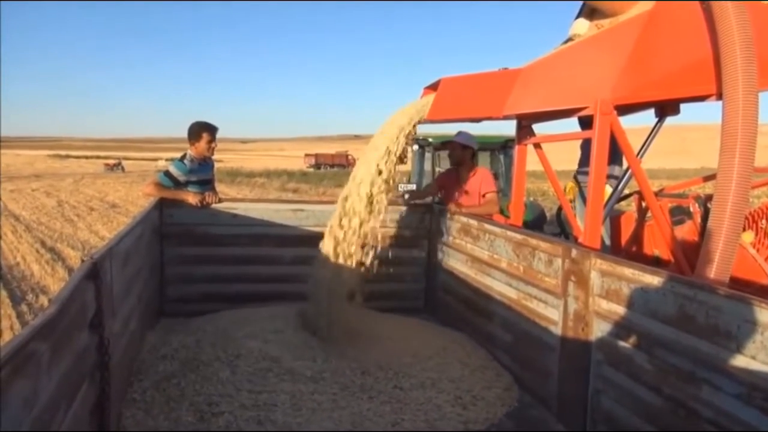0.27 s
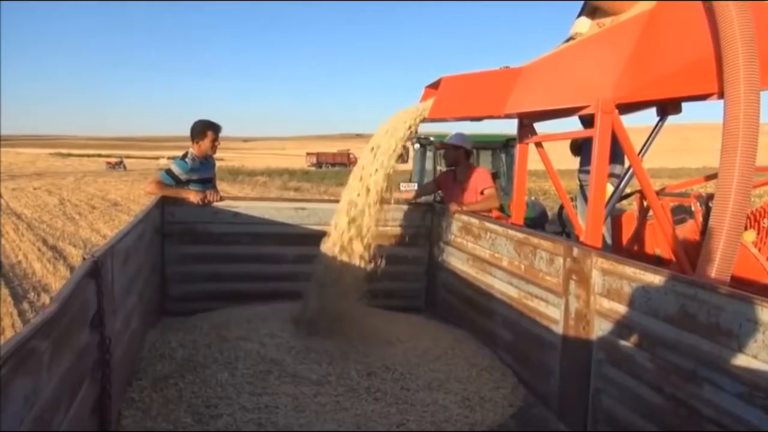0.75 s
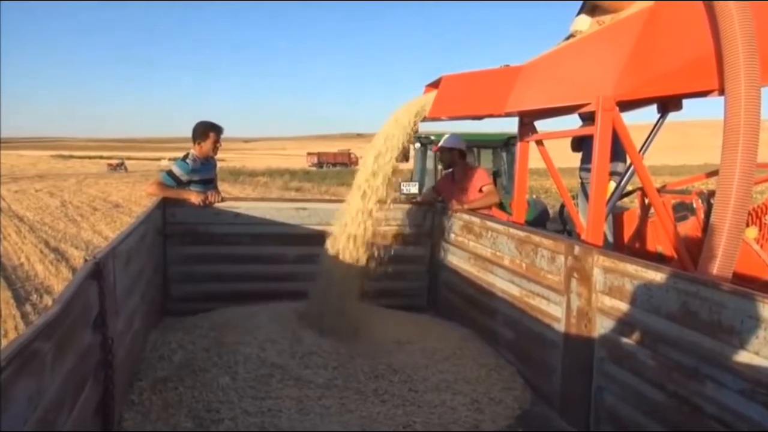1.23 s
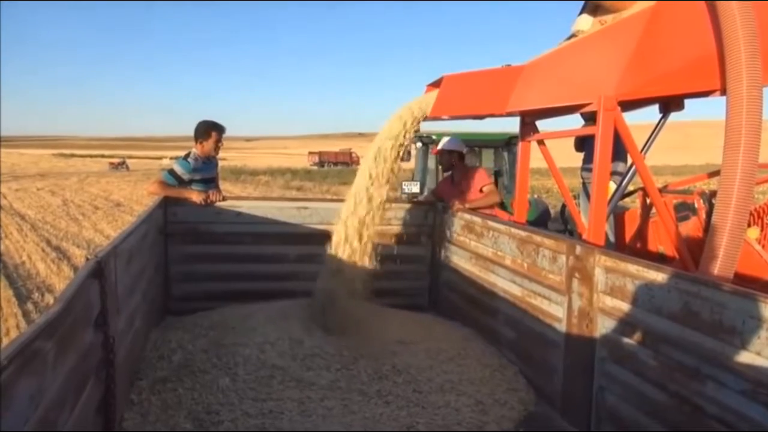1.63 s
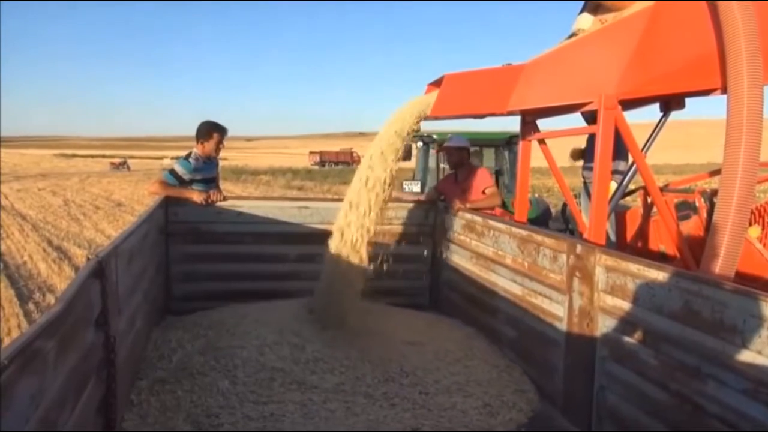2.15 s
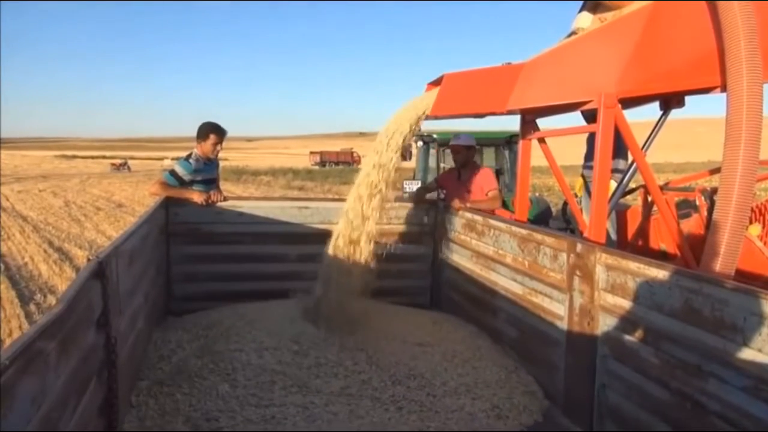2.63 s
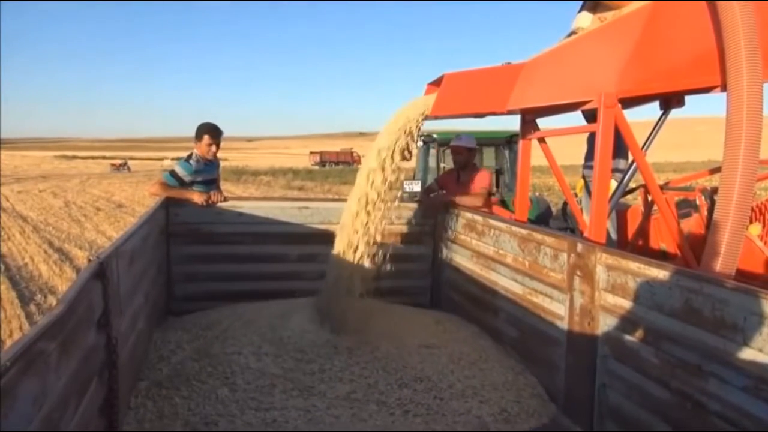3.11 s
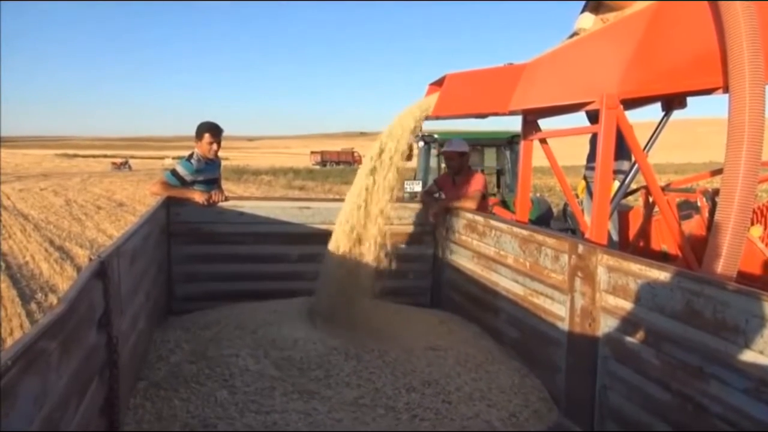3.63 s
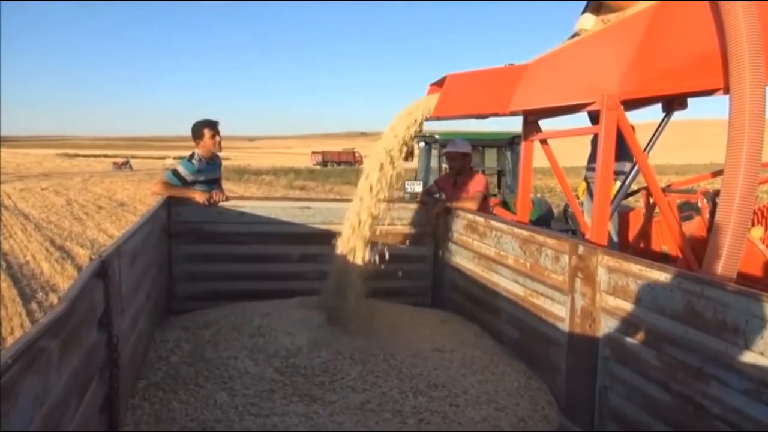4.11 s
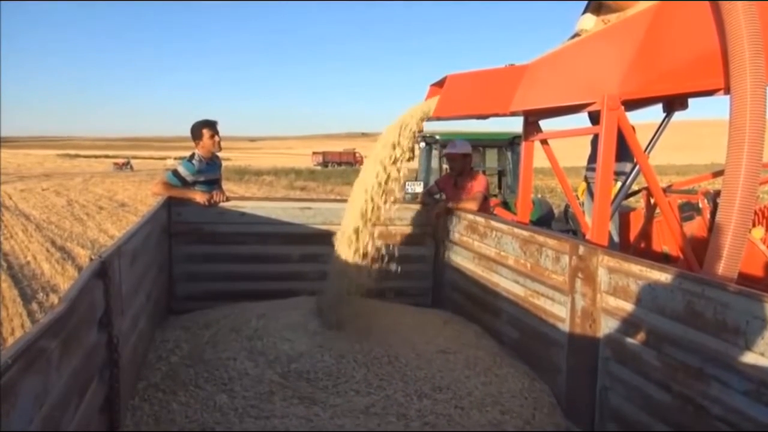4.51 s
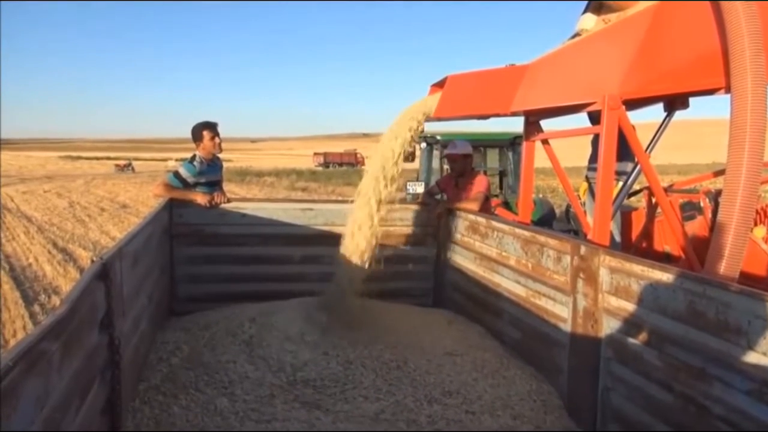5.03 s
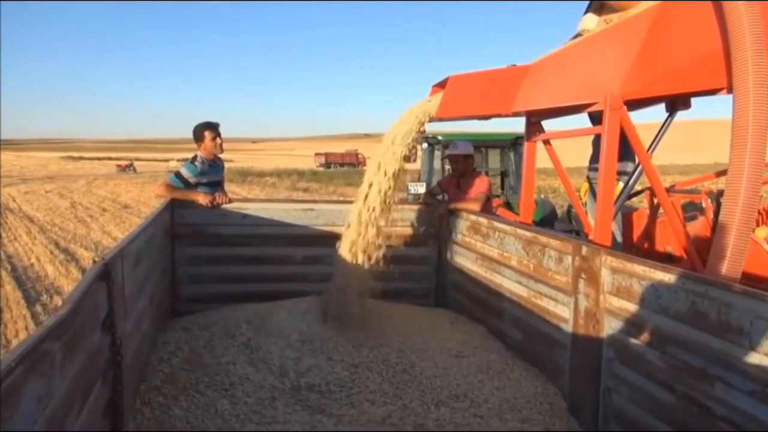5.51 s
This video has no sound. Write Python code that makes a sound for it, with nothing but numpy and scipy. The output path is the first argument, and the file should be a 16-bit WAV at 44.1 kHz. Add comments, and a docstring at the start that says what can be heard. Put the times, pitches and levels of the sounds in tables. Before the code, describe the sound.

A bright, dense hiss of grain pouring from a harvester spout into a steel trailer runs from the start to the end, nearly six seconds. It is made of countless tiny kernel ticks and light metallic pings that merge together, surging and easing slightly with the flow. Between about 0.9 and 1.7 seconds, a handful of very short, higher pings stand out, the clearest near 1.3 seconds. Beneath the hiss, a quieter, dull rumble like shaken steel walls flutters irregularly, stronger on the right. It swells a little from about 2.3 to 3.5 seconds and again from 4.2 to 5 seconds. Lower and fainter still, the machine's deep drone slowly rises and sinks throughout. The sound is close and dry, in an open field, with a narrow stereo image.

```python
"""A bright hiss of threshed grain pouring from a spout onto the heap in a steel trailer, in an open field.
Thousands of kernels a second tick against each other or ping on the steel; the impacts merge into
noise that surges with the flow, and a few louder notes ring out early on. Beneath it a dull rumble,
as of shaken steel walls, swells and flickers, louder on the right, over the deep drone of the machine.
A narrow stereo microphone stands close by."""
import sys
import numpy as np
from scipy import signal
from scipy.fft import rfft, irfft, next_fast_len
from scipy.io import wavfile
from scipy.ndimage import uniform_filter1d

SR = 44100
rng = np.random.default_rng(int(sys.argv[2]) if len(sys.argv) > 2 else 0)


def wrap_up_sound(samples):
    """Save the sound to the file named by the first command line argument, as 16-bit audio."""
    columns = np.atleast_2d(samples).T
    # keep every value between -1 and 1, then stretch to whole-number steps
    tamed = np.clip(columns, -1, 1)
    steps = np.round(tamed * 32767).astype(np.int16)
    wavfile.write(sys.argv[1], SR, steps)


N = 253611
TIME = np.arange(N) / SR
FRAMES = dict(nperseg=512, noverlap=384)


def amp(db):
    """Amplitude ratio of a level in decibels."""
    return 10 ** (np.asarray(db) / 20)


def unit_rms(x):
    """Normalisation to unit mean power."""
    return x / np.sqrt(np.mean(x ** 2) + 1e-20)


def curve(points):
    """Interpolation in log frequency: turns (Hz, dB) points into a function."""
    freqs, db = np.transpose(points)
    return lambda hz: np.interp(np.log(hz + 1), np.log(freqs + 1), db)


def filtered(x, gain_db):
    """Zero-phase filtering by a function from Hz to dB."""
    size = next_fast_len(N + 4096)
    hz = np.fft.rfftfreq(size, 1 / SR)
    return irfft(rfft(x, size) * amp(gain_db(hz)), size)[..., :N]


def flutter(top_hz):
    """Random modulation: low-passed noise of unit rms."""
    return unit_rms(filtered(rng.standard_normal(N), lambda hz: -20 * np.log10(1 + (hz / top_hz) ** 2)))


def band_envelopes(x, splits_hz, rows):
    """Amplitude modulation by band: each band of x follows its own level column."""
    times, *levels_db = np.transpose(rows)
    lows = [filtered(x, lambda hz: -20 * np.log10(1 + (hz / edge) ** 6)) for edge in splits_hz]
    bands = np.diff([0 * x, *lows, x], axis=0)
    return sum(amp(np.interp(TIME, times, db)) * unit_rms(band) for db, band in zip(levels_db, bands))


def kernel_ticks(per_s, spread_db):
    """Shot noise: kernels collide at random instants, most softly, a few hard."""
    strength, polarity, chance = rng.random((3, N))
    size = amp(spread_db * np.minimum(-np.log(strength + 1e-9), 4))
    return unit_rms(size * np.sign(polarity - .5) * (chance < per_s / SR))


def steel_pings(per_s, decay_s, spread_db):
    """Damped free vibration: each kernel that strikes steel rings briefly at a random pitch."""
    hz, times, noise = signal.stft(rng.standard_normal(N), SR, **FRAMES)
    hop_s = times[1]
    chance, strength = rng.random((2,) + noise.shape)
    size = amp(spread_db * np.minimum(-np.log(strength + 1e-9), 3))
    strikes = noise * size * (chance < per_s * hop_s / len(hz))
    poles = np.exp(2j * np.pi * hz * hop_s - hop_s / decay_s)  # phase advance and decay per frame
    ringing = np.array([signal.lfilter([1], [1, -pole], row) for pole, row in zip(poles, strikes)])
    return unit_rms(signal.istft(ringing, **FRAMES)[1][:N])


# Spectrum of a kernel's tick on the heap: (frequency [Hz], gain [dB])
TICK_SPECTRUM = [(100, -29), (400, -17.5), (820, -13.5), (1150, -8.5), (2050, -7.5), (3600, -6),
                 (4900, -6.5), (7000, -5.5), (8600, -8), (9500, -11), (11100, -14), (12800, -14.5),
                 (14000, -23.5), (14500, -20), (15100, -21)]
# Resonances and dips of the hollows in trailer and microphone housing:
# (start frequency [Hz], end frequency [Hz], bandwidth [Hz], start gain [dB], end gain [dB])
CAVITY_MODES = [(945, 970, 180, 4.5, 5), (1356, 1374, 280, 6, 5.5), (1784, 1744, 330, 6, 5),
                (2760, 2680, 780, 4, 4.5), (3400, 3230, 250, .5, 1.5), (4180, 4300, 680, 3.5, 4),
                (5480, 5520, 600, 2.5, 3), (6100, 5980, 770, 3, 3.5), (7100, 7400, 500, 1, 1),
                (11450, 11500, 350, 2.5, 3), (11900, 11840, 1450, 5, 5.5), (3650, 3600, 440, -.3, -2),
                (4800, 5000, 500, -1.5, -0.7)]


def cavity_resonance(impacts):
    """Resonance: hollows colour the ticks, crossfading to a shifted response as the heap grows."""
    def response(centres, gains):
        return lambda hz: curve(TICK_SPECTRUM)(hz) + sum(
            db / (1 + (2 * (hz - centre) / width) ** 2) for centre, width, db in zip(centres, widths, gains))

    start_hz, end_hz, widths, start_db, end_db = np.transpose(CAVITY_MODES)
    early = filtered(impacts, response(start_hz, start_db))
    late = filtered(impacts, response(end_hz, end_db))
    progress = np.arange(N) / N
    return (1 - progress) * early + progress * late


def shimmer(x, depth_db):
    """Spectral modulation: random patches of time and frequency rise and sink."""
    spectra = signal.stft(x, **FRAMES)[2]
    patches = uniform_filter1d(rng.standard_normal(spectra.shape[-2:]), size=8, axis=0)
    patches = unit_rms(uniform_filter1d(patches, size=30, axis=1))
    return signal.istft(spectra * amp(depth_db * patches), **FRAMES)[1][..., :N]


# Surges of the grain flow: (time [s], low-band gain [dB], mid-band gain [dB], treble gain [dB])
GRAIN_FLOW = [(0.0, -31.5, -27, -26.5), (0.05, -31, -28.5, -28.5), (0.77, -33.5, -30.5, -29.5),
              (0.94, -30.5, -28.5, -28), (1.01, -33.5, -30.5, -30.5), (1.1, -32.5, -28.5, -30),
              (1.2, -32.5, -31.5, -29.5), (1.42, -32.5, -29.5, -26.5), (1.57, -31.5, -29, -28.5),
              (1.68, -31.5, -28.5, -28.5), (2.11, -32.5, -31, -30), (2.21, -31, -29, -27.5),
              (2.27, -33, -31.5, -30), (2.5, -32.5, -30.5, -29.5), (2.75, -32, -29, -27),
              (2.9, -31.5, -29.5, -28.5), (2.98, -34, -31, -29.5), (3.3, -34, -31, -31),
              (3.41, -32, -29.5, -30), (3.65, -34, -31, -30), (3.79, -32.5, -29, -28),
              (4.08, -34, -30.5, -30), (4.43, -34, -29.5, -30), (4.55, -33.5, -32.5, -31.5),
              (4.75, -34.5, -29.5, -30.5), (4.88, -33, -31, -27.5), (5.03, -32.5, -28.5, -29),
              (5.08, -37, -33.5, -29.5), (5.17, -33, -29, -29.5), (5.36, -32, -31.5, -32),
              (5.67, -32, -29, -27.5), (5.75, -33, -33, -28.5)]


def grain_hiss():
    """Superposition: dense impacts merge into a hiss that follows the flow; returns mid and side."""
    impacts = np.array([kernel_ticks(per_s=14000, spread_db=1.05)
                        + amp(-7.5) * steel_pings(per_s=3600, decay_s=0.0072, spread_db=1.7)
                        for _ in range(2)])
    hiss = shimmer(cavity_resonance(impacts), depth_db=0.4)
    surging = band_envelopes(hiss, splits_hz=[2300, 4900], rows=GRAIN_FLOW)
    return surging * amp(-0.67 + 0.3 * flutter(top_hz=18))


# Spectrum of the rumble: (frequency [Hz], gain [dB])
WALL_SPECTRUM = [(40, -46), (80, -16.5), (130, -5), (170, -3), (215, -.5), (260, -0.5), (320, -1.5),
                 (390, -2.5), (470, -5), (620, -8.5), (850, -13), (1100, -29.5)]
# Level of the rumble, slow swells with brief random flickers:
# (time [s], lower-band level [dB], upper-band level [dB])
RUMBLE_LEVELS = [(0.0, -43, -43), (0.22, -44, -42), (0.29, -39.5, -39.5), (0.48, -39.5, -45),
                 (0.54, -45, -41.5), (0.74, -40, -41), (0.77, -46.5, -38), (1.04, -42.5, -50.5),
                 (1.22, -45.5, -38), (1.25, -40.5, -46), (1.41, -45, -43), (1.5, -38, -42),
                 (1.9, -45.5, -46), (2.35, -38.5, -37), (2.8, -38.5, -39), (3.2, -39.5, -38),
                 (3.5, -39, -41), (3.75, -42, -42), (4.05, -41.5, -41.5), (4.2, -38, -38),
                 (4.45, -37.5, -38), (4.68, -37.5, -37), (4.72, -34, -42), (4.77, -42, -40),
                 (4.95, -35, -36), (4.98, -41.5, -39.5), (5.35, -43, -41), (5.67, -39.5, -40),
                 (5.7, -41, -47), (5.75, -44, -38)]


def wall_rumble():
    """Forced vibration: fluttering low noise, as of steel walls shaken by the load; mid and side."""
    noise = filtered(rng.standard_normal((2, N)), curve(WALL_SPECTRUM))
    rumble = band_envelopes(noise, splits_hz=[300], rows=RUMBLE_LEVELS)
    return rumble * amp(-0.1 + 0.97 * flutter(top_hz=21))


# Spectrum of the machine's drone: (frequency [Hz], gain [dB])
MACHINE_SPECTRUM = [(20, -36), (35, -21), (52, -7.5), (70, -4.5), (100, 0), (135, -6), (200, -28)]
# Swells of the drone: (time [s], level [dB])
MACHINE_SWELLS = [(0, -55), (.8, -50), (1.5, -55), (2.1, -52), (2.7, -48), (3.5, -50.5), (4.5, -51),
                  (5.0, -50), (5.75, -54)]


def machine_drone():
    """Band-limited noise: the machine's deep drone slowly swells and sinks; mid and side."""
    noise = unit_rms(filtered(rng.standard_normal((2, N)), curve(MACHINE_SPECTRUM)))
    return amp(np.interp(TIME, *np.transpose(MACHINE_SWELLS))) * noise


# Loudest single notes in the patter: (time [s], frequency [Hz], gain [dB])
LOUD_NOTES = [(.945, 2700, -22), (1.15, 3000, -25), (1.223, 1320, -28), (1.257, 2600, -18),
              (1.46, 4300, -24), (1.63, 4000, -24), (1.72, 2900, -23)]


def ringing_notes(rise_s=.003, decay_s=.008):
    """Exponential decay: short damped sinusoids stand out of the hiss."""
    notes = np.zeros(N)
    for onset, hz, db in LOUD_NOTES:
        age = np.maximum(TIME - onset, 0)
        envelope = (1 - np.exp(-age / rise_s)) * np.exp(-age / decay_s)
        notes += amp(db) * envelope * np.sin(2 * np.pi * hz * age)
    return notes


# Stereo balance of the bass: (frequency [Hz], left minus right level [dB])
BASS_BALANCE = [(25, -1), (60, 0), (110, 0.5), (150, -0.5), (220, -6), (320, -5), (500, -1), (750, -3.5),
                (900, 0)]
# Part of the hiss that differs between the channels: (frequency [Hz], side gain [dB])
HISS_WIDTH = [(4900, -81), (5250, -30), (5800, -15), (6800, -12.5), (8500, -8), (10000, -8.5), (10900, -7),
              (11200, -60)]
# Part of the rumble and drone that differs between the channels: (frequency [Hz], side gain [dB])
BASS_WIDTH = [(25, -17), (120, -18.5), (400, -19), (800, -10.5), (950, -80)]


def scene():
    """Mid-side stereo: a weak side signal keeps the image narrow; louder bass on the right shifts it."""
    hiss_mid, hiss_side = grain_hiss()
    bass_mid, bass_side = wall_rumble() + machine_drone()
    mid = hiss_mid + bass_mid + ringing_notes()
    side = filtered(hiss_side, curve(HISS_WIDTH)) + filtered(bass_side, curve(BASS_WIDTH))
    balance_db = curve(BASS_BALANCE)
    left = filtered(mid, lambda hz: balance_db(hz) / 2)
    right = filtered(mid, lambda hz: -balance_db(hz) / 2)
    return np.array([left + side, right - side])


def record(dry, cutoff_hz=15050):
    """Band limiting: a steep low-pass filter removes the highest treble."""
    lowpass = signal.firwin(1023, cutoff_hz, window=("kaiser", 10), fs=SR)
    return signal.oaconvolve(dry, lowpass[None], "same")


dry = scene()
out = record(dry)
wrap_up_sound(out)
```